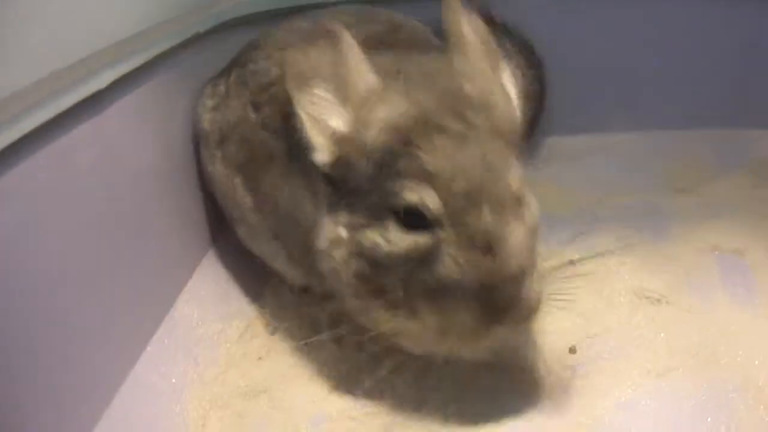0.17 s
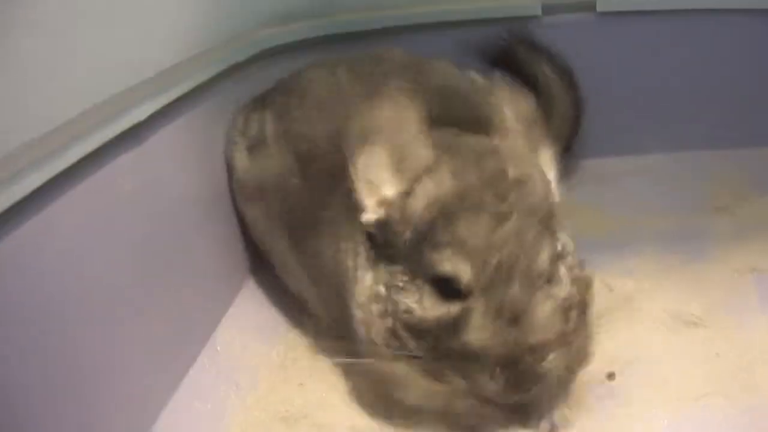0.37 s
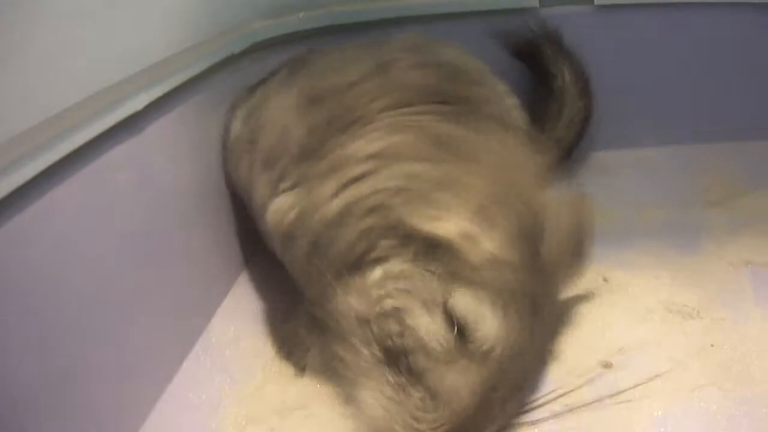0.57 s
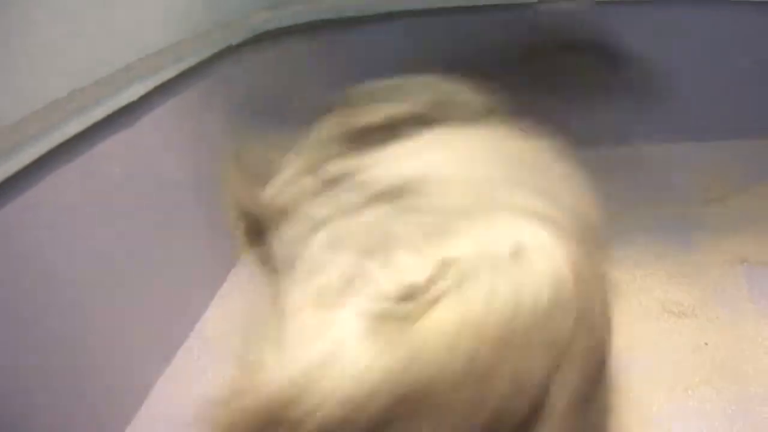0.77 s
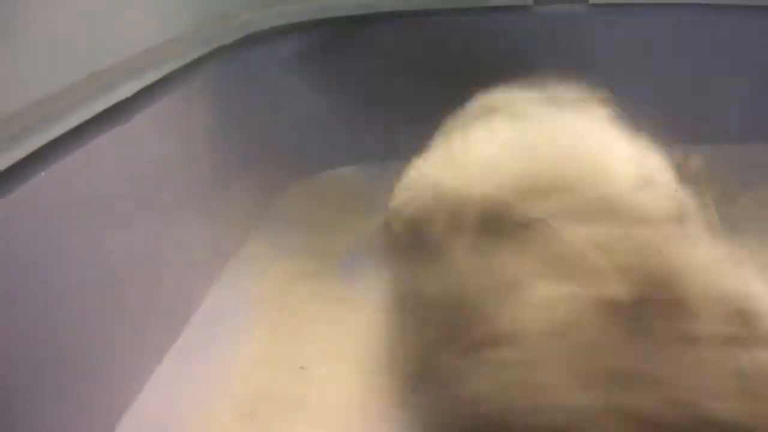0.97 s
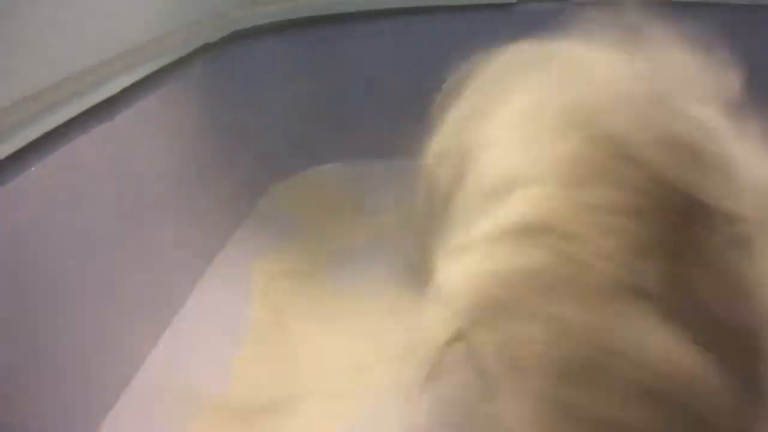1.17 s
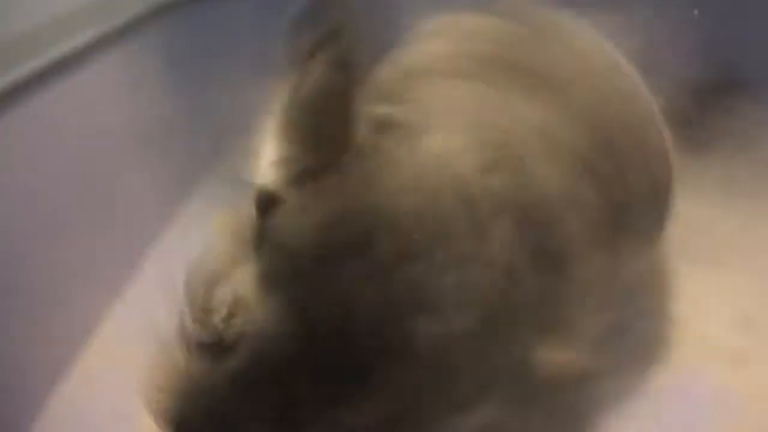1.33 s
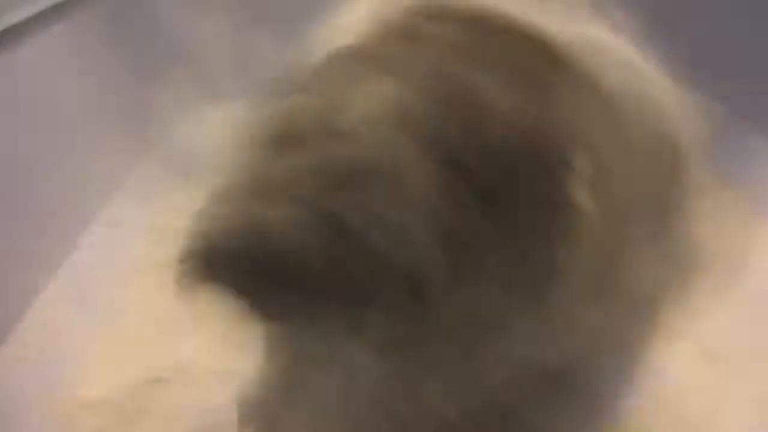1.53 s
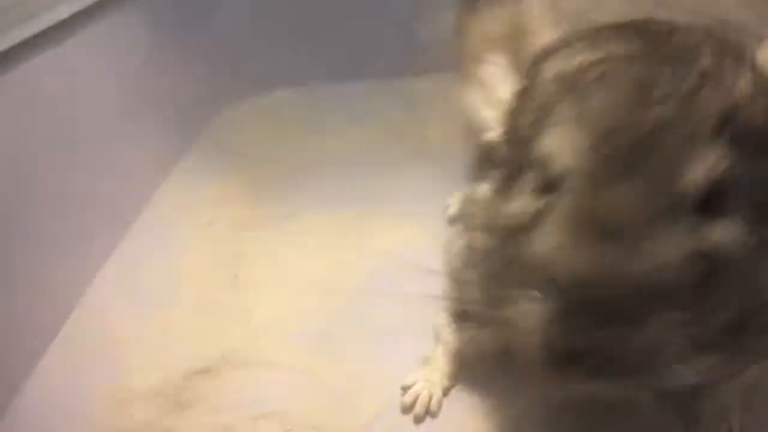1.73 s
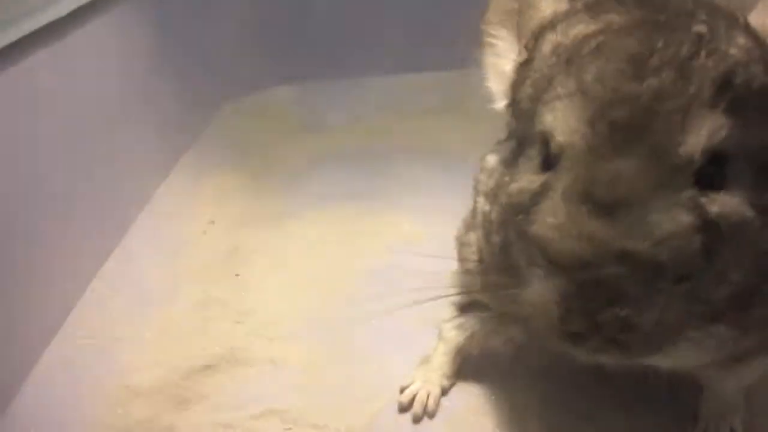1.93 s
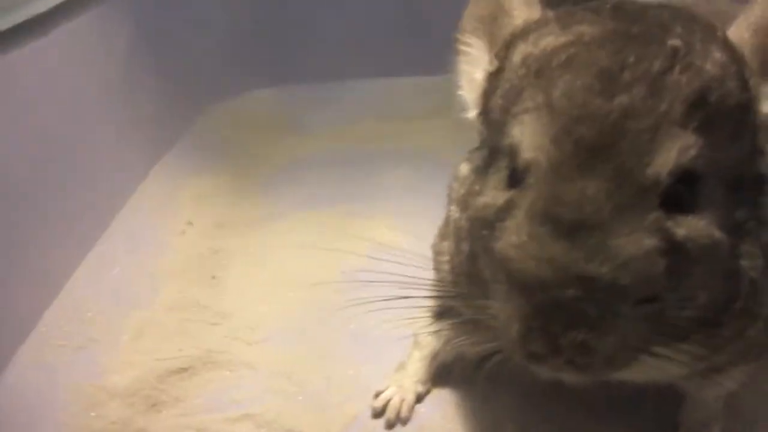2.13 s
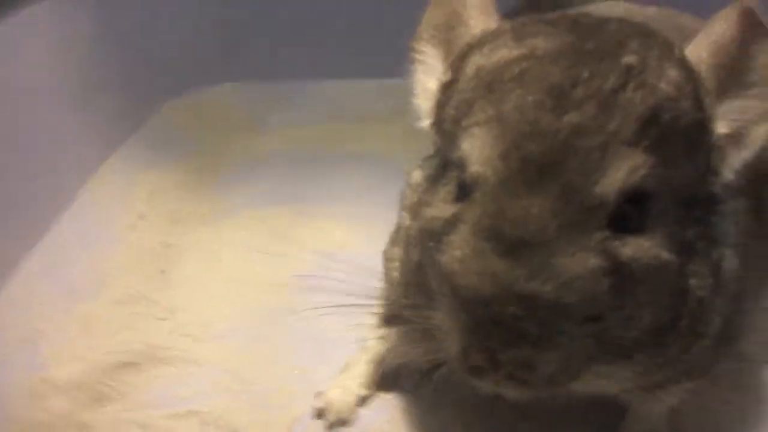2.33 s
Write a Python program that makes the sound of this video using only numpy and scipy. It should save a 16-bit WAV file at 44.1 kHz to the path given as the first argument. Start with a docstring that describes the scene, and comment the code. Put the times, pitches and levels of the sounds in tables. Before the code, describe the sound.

Dry, grainy fur-on-dust swishes in short bouts, with small feet knocking hollow plastic and the body thumping softly; heard very close in a quiet room, thinning to a few faint scrapes at the end.

```python
"""Chinchilla dust bath

A chinchilla rolls in dry bathing dust in a plastic tub, close to the microphone.
Rubbing is grainy noise in bouts; flicks are short noise sprays; knocks and thumps are damped modes.
Noise rumbles as weight shifts; quiet room noise and the room's faint hollow hum lie behind.
A limiter ducks the whole sound at its hardest peaks.
"""
import sys
import numpy as np
from scipy import signal
from scipy.fft import rfft, irfft, next_fast_len
from scipy.io import wavfile
from scipy.ndimage import uniform_filter1d, minimum_filter1d, map_coordinates

SR = 44100
rng = np.random.default_rng(int(sys.argv[2]) if len(sys.argv) > 2 else 0)


def unload_audio(sound):
    """Save the sound as a 16-bit wav file, at the path given as the first command line argument."""
    columns = np.transpose(np.atleast_2d(sound))
    # keep every value between -1 and 1, then stretch to whole-number steps
    steps = np.round(np.clip(columns, -1, 1) * 32767)
    wavfile.write(sys.argv[1], SR, steps.astype(np.int16))


N = 110250


def amp(db):
    """Decibels to gain."""
    return 10 ** (np.asarray(db) / 20)


def unit(x):
    """Scale to rms 1."""
    return x / np.sqrt(np.mean(x ** 2) + 1e-20)


def level(rows):
    """Gain per sample, linear in dB between (time [s], level [dB]) rows."""
    times_s, levels_db = np.transpose(rows)
    return amp(np.interp(np.arange(N) / SR, times_s, levels_db))


def wobble(knots_per_s):
    """Smooth random curve through normally distributed knots."""
    knots = rng.standard_normal(4096)
    return map_coordinates(knots, [np.arange(N) * knots_per_s / SR], mode="wrap")


def colour(x, spectrum, peaks=()):
    """Filter x by (frequency [Hz], gain [dB]) points and resonant peaks; rms 1."""
    m = next_fast_len(N + 8192)
    f = np.fft.rfftfreq(m, 1 / SR)
    hz, db = np.transpose(spectrum)
    gain_db = np.interp(np.log(f + 1), np.log(hz + 1), db)
    for centre_hz, width_hz, lift_db in peaks:
        gain_db = gain_db + lift_db / (1 + (2 * (f - centre_hz) / width_hz) ** 2)
    return unit(irfft(rfft(x, m) * amp(gain_db), m)[:N])


def noise(spectrum, peaks=()):
    """Coloured noise of rms 1."""
    return colour(rng.standard_normal(N), spectrum, peaks)


def decay(t, t60_s):
    """Gain that falls 60 dB in t60_s."""
    return np.exp(-np.log(1000) * t / t60_s)


def ring(t, hz, t60_s, attack_s):
    """One damped mode with an exponential onset."""
    return np.sin(2 * np.pi * hz * t) * decay(t, t60_s) * (1 - np.exp(-t / attack_s))


def add(out, start_s, x):
    """Mix x into out at start_s."""
    i = round(start_s * SR)
    out[i:i + len(x)] += x[:N - i]


GRAINS_PER_S, GRAIN_SHARE, GRAIN_SPREAD_DB = 6500, 0.28, 2.5  # share of power


def grains():
    """Sparse random slips of dust grains over a smooth swish of fur."""
    struck = rng.random(N) < GRAINS_PER_S / SR
    sizes = rng.standard_normal(N) * amp(GRAIN_SPREAD_DB * rng.standard_normal(N))
    swish = rng.standard_normal(N)
    return np.sqrt(GRAIN_SHARE) * unit(struck * sizes) + np.sqrt(1 - GRAIN_SHARE) * swish


PATCH_HZ, PATCH_S = 110, 0.035  # size of the resonant patches
STFT_SIZE, STFT_HOP = 1024, 512


def shifting(x, depth_db):
    """The body covers and frees parts of the tub, so narrow resonances come and go."""
    z = signal.stft(x, nperseg=STFT_SIZE)[2]
    bins = max(1, round(PATCH_HZ * STFT_SIZE / SR))
    frames = max(1, round(PATCH_S * SR / STFT_HOP))
    field = uniform_filter1d(rng.standard_normal(z.shape), bins, axis=0)
    field = uniform_filter1d(field, frames, axis=1)
    shifted = signal.istft(z * amp(depth_db * unit(field)), nperseg=STFT_SIZE)[1]
    return unit(shifted[:N])


# rubbing bouts, one list each: (time [s], hiss level before trim [dB], rasp level before trim [dB])
RUB_BOUTS = [
    [(0.0, -54, -77), (0.044, -80, -77), (0.062, -44.5, -60), (0.096, -71, -49.5), (0.118, -49, -46),
     (0.15, -84, -67), (0.188, -67, -55), (0.226, -46, -52), (0.235, -36, -35)],
    [(0.266, -52, -45), (0.272, -63, -71), (0.28, -41.5, -35), (0.304, -34, -36), (0.334, -36, -36.5),
     (0.344, -28, -38.5), (0.358, -28, -23), (0.376, -49.5, -44), (0.38, -44, -46)],
    [(0.38, -43, -51), (0.394, -28, -29), (0.434, -29, -35), (0.462, -26.5, -24), (0.472, -37, -31.5),
     (0.482, -31, -24.5), (0.502, -34, -38), (0.528, -28, -26.5), (0.57, -39.5, -40)],
    [(0.57, -40, -27), (0.594, -38, -34), (0.612, -28.5, -22), (0.672, -41, -41.5), (0.692, -40, -27.5),
     (0.73, -38.5, -39)],
    [(0.73, -33, -29.5), (0.744, -29.5, -26), (0.76, -34, -33), (0.796, -30, -24.5), (0.842, -30.5, -34),
     (0.854, -59, -48), (0.862, -39, -43), (0.872, -55, -41), (0.876, -30, -29)],
    [(0.9, -59, -58), (0.952, -48, -43.5), (0.99, -41.5, -46), (1.008, -58, -68), (1.036, -40.5, -52),
     (1.07, -29.5, -34.5), (1.08, -38, -28), (1.094, -45, -39.5), (1.117, -25, -34)],
    [(1.15, -56, -37), (1.156, -50, -51), (1.194, -39.5, -37.5), (1.23, -43, -44.5), (1.258, -30, -26),
     (1.288, -38, -38.5), (1.318, -37.5, -36), (1.336, -43.5, -41), (1.36, -40.5, -36.5)],
    [(1.36, -39, -35.5), (1.38, -31, -34), (1.388, -35, -35), (1.438, -25.5, -27.5), (1.46, -29, -32),
     (1.47, -38.5, -30.5), (1.49, -27.5, -37), (1.506, -45, -32.5), (1.52, -38, -44)],
    [(1.522, -44, -40), (1.528, -30, -27.5), (1.572, -24, -27), (1.584, -36, -28), (1.6, -30, -20.5),
     (1.614, -43, -37), (1.632, -50, -39)],
    [(1.67, -35, -59), (1.686, -47, -37.5), (1.698, -36.5, -27.5), (1.71, -40, -38), (1.728, -41, -33.5),
     (1.742, -43, -43), (1.762, -49.5, -46.5), (1.768, -51, -56), (1.8, -58, -51)],
    [(1.8, -60, -77), (1.812, -41.5, -31), (1.84, -37.5, -39), (1.854, -35.5, -35), (1.866, -39.5, -46),
     (1.902, -42, -34.5), (1.95, -54, -64), (1.954, -55, -53), (2.015, -63, -64)],
    [(2.05, -52, -52), (2.162, -57, -52.5), (2.174, -66, -63), (2.292, -68, -74), (2.306, -51, -48),
     (2.324, -55, -56), (2.352, -59, -55), (2.49, -37, -34), (2.5, -47, -42)],
]
# dust hiss spectrum: (frequency [Hz], density [dB per Hz])
HISS_SPECTRUM = [(300, -73), (1500, -1), (2600, -6), (3200, -2.5), (4200, 0), (6000, -3.5), (8000, -5),
                 (10800, -8)]
# faint wall resonances in the hiss: (centre [Hz], width [Hz], lift [dB])
HISS_RESONANCES = [(3080, 70, 3.5), (3240, 70, 4), (3552, 50, 3), (3940, 130, 3), (4398, 40, 3)]
# tub rasp spectrum: (frequency [Hz], density [dB per Hz])
RASP_SPECTRUM = [(60, -2), (150, -3), (250, -2), (350, -20), (470, 0.5), (800, -0.5), (1300, -0.5),
                 (2000, -11), (2800, -11.5), (6000, -27)]
# tub resonances excited by rubbing: (centre [Hz], width [Hz], lift [dB])
RASP_RESONANCES = [(461, 120, 5), (780, 330, 5.5), (995, 87, 5.5), (1260, 52, -0.5), (1681, 46, 8),
                   (1859, 29, 12.5), (2132, 420, 7), (2350, 9, -1.5)]
HISS_TRIM_DB, RASP_TRIM_DB, CONTACT_FADE_S = -0.5, 2, 0.027


def rubbing(flutter_db=1.23):
    """Dust hisses under the fur and rasps through the tub, catching and slipping."""
    t = np.arange(N) / SR
    rows = np.concatenate(RUB_BOUTS)
    rows = rows[np.argsort(rows[:, 0], kind="stable")]
    touching = np.any([(t >= bout[0][0]) & (t <= bout[-1][0]) for bout in RUB_BOUTS], axis=0)
    contact = uniform_filter1d(touching * 1.0, max(1, round(CONTACT_FADE_S * SR)))
    hiss = shifting(colour(grains(), HISS_SPECTRUM, HISS_RESONANCES), depth_db=1.7)
    rasp = shifting(colour(grains(), RASP_SPECTRUM, RASP_RESONANCES), depth_db=3.0)
    hiss = amp(HISS_TRIM_DB) * level(rows[:, [0, 1]]) * hiss
    rasp = amp(RASP_TRIM_DB) * level(rows[:, [0, 2]]) * rasp
    return contact * amp(flutter_db * wobble(120)) * (hiss + rasp)


# flung pinches of dust: (time [s], level [dB], length [s], resonance centre [Hz])
DUST_FLICKS = [(0.094, -53, .006, 2000), (0.511, -34, 0.0076, 4080), (0.86, -42, 0.02, 5800),
               (1.061, -27.5, 0.021, 6070), (1.527, -45, 0.01, 4470), (1.634, -34.5, 0.0071, 7100),
               (2.021, -38, 0.028, 6200), (2.365, -42.5, 0.0048, 4900)]
FLICK_RISE_S, FLICK_WIDTH_HZ, FLICK_LIFT_DB = 0.00094, 1000, 12.5


def flicks():
    """A paw flings a pinch of dust against the plastic: a short resonant spray of grains."""
    out, t = np.zeros(N), np.arange(SR // 8) / SR
    for start_s, db, length_s, hz in DUST_FLICKS:
        peak = (hz, FLICK_WIDTH_HZ, FLICK_LIFT_DB)
        spray = colour(grains(), HISS_SPECTRUM, [peak])[:len(t)]
        envelope = (1 - np.exp(-t / FLICK_RISE_S)) * np.exp(-(t / length_s) ** 2)
        add(out, start_s, amp(db) * spray * envelope)
    return out


KNOCK_ATTACK_S, GRIT_T60_S = 0.00055, 0.036
SHUDDER_DB, SHUDDER_T60_S = -22.5, 0.13  # level against the knock


def modes(t, table, scatter_db):
    """Sum of damped modes with randomly scattered levels."""
    return sum(amp(db + scatter_db * rng.standard_normal()) * ring(t, hz, t60_s, KNOCK_ATTACK_S)
               for hz, db, t60_s in table)


def excerpt(x, length):
    """Excerpt of x from a random point, wrapping round."""
    return np.roll(x, rng.integers(N))[:length]


# feet on the tub:
# (time [s], level [dB], spot pitch [Hz], spot t60 [s], tub ring level [dB], grit level [dB])
FOOT_KNOCKS = [ (0.077, -31, 507, 0.027, -57, -57), (0.1145, -27.5, 532, 0.043, -41.5, -54),
               (0.2422, -8.5, 770, 0.033, -36, -15), (0.2467, -8, 517, 0.034, -48, -60),
               (0.3909, -16.5, 614, 0.056, -38, -33), (0.4113, -17, 610, 0.024, -22.5, -21),
               (0.4795, -16.5, 632, 0.069, -22, -25), (0.5065, -6, 340, 0.0095, -25, -20.5),
               (0.6845, -24, 793, 0.079, -42, -43), (0.8450, -9.5, 390, 0.01, -33, -28.5),
               (0.8813, 2.5, 880, 0.0085, -24, -19), (0.8858, 0, 730, 0.016, -24, -40),
               (0.8938, -8.5, 620, 0.031, -42, -45), (0.9669, -6.5, 770, 0.011, -50, -35),
               (0.9867, 1, 400, 0.0088, -20, -43), (0.9965, -13, 643, 0.073, -32, -50),
               (1.0780, -5.5, 560, 0.023, -28, -42), (1.1186, 1.5, 446, 0.022, -15.5, -20),
               (1.2515, -15, 694, 0.024, -42, -35), (1.271, -14, 600, 0.012, -56, -26),
               (1.378, -9, 503, 0.023, -21.5, -37), (1.3813, -13.5, 475, 0.015, -31, -42),
               (1.5981, -18, 975, 0.05, -30, -39), (1.6449, 2.5, 477, 0.027, -15.5, -14),
               (1.8085, -21, 825, 0.0052, -29, -49), (1.8154, -13.5, 494, 0.056, -29, -51),
               (1.848, -22.5, 671, 0.084, -55, -28.5), (2.037, -24, 490, 0.061, -45, -43)]
# tub modes: (frequency [Hz], level against the tub ring [dB], t60 [s])
TUB_MODES = [(258, -1, 0.034), (355, -12, 0.092), (505, 0, 0.11), (573, -8.5, 0.078), (717, 8, 0.037),
             (833, 1.5, 0.06), (925, -10, 0.14), (1178, -0.5, 0.036), (1364, -2, 0.045),
             (1690, -18.5, 0.022)]
# bent spot's snap on contact: (frequency [Hz], level against the knock [dB], t60 [s])
SNAP_MODES = [(1524, -14, 0.0087), (1885, -23.5, 0.015), (3730, -19.5, 0.0038)]
# crushed grit spectrum: (frequency [Hz], density [dB per Hz])
GRIT_SPECTRUM = [(200, 14.5), (900, -6), (2000, 3.5), (3500, -2.5), (6000, -12.5), (10800, -17)]
# tub's diffuse shudder spectrum: (frequency [Hz], density [dB per Hz])
SHUDDER_SPECTRUM = [(50, -28), (130, -3), (300, -3), (600, -1.5), (900, -17), (1600, -14.5), (2500, -35),
                    (10000, -40.5)]


def knocks(scatter_db=0.5):
    """Each foot bends a spot of plastic, rings the whole tub and crushes some grit."""
    out, t = np.zeros(N), np.arange(SR // 4) / SR
    grit, diffuse = noise(GRIT_SPECTRUM), noise(SHUDDER_SPECTRUM)
    for start_s, db, hz, t60_s, ring_db, grit_db in FOOT_KNOCKS:
        spot = ring(t, hz, t60_s, KNOCK_ATTACK_S)
        tub = modes(t, TUB_MODES, scatter_db)
        crunch = excerpt(grit, len(t)) * decay(t, GRIT_T60_S)
        shudder = amp(SHUDDER_DB) * excerpt(diffuse, len(t)) * decay(t, SHUDDER_T60_S)
        snap = modes(t, SNAP_MODES, scatter_db)
        knock = amp(db) * (spot + snap + shudder)
        add(out, start_s, knock + amp(ring_db) * tub + amp(grit_db) * crunch)
    return out


# body against the floor: (time [s], level [dB], pitch [Hz], t60 [s])
BODY_THUMPS = [ (0.246, -21.5, 130, 0.039), (0.394, -27, 172, .08), (0.48, -21, 145, 0.12),
               (0.807, -13.5, 132, 0.031), (0.645, -24, 102, 0.029), (0.841, -3.5, 136, 0.044),
               (0.861, -16, 290, 0.022), (0.8677, -10.5, 194, 0.029), (0.912, -22, 178, 0.084),
               (0.929, -24, 112, 0.081), (0.988, -9.5, 279, 0.081), (1.009, -18.5, 162, 0.2),
               (1.081, -16, 166, .06), (1.118, -23, 182, 0.11), (1.195, -15.5, 143, 0.033),
               (1.379, -27, 148, 0.044), (1.547, -27, 79, 0.15), (1.724, -22, 333, 0.043),
               (1.733, -15.5, 245, 0.028), (1.7477, -17.5, 164, 0.076), (2.213, -37.5, 210, 0.16)]
# weight shifting on the floor: (time [s], rumble level before trim [dB])
WEIGHT_SHIFTS = [(0.0, -61), (0.12, -41.5), (0.2, -53), (0.4, -32.5), (0.47, -33), (0.86, -42), (1.0, -40),
                 (1.04, -26.5), (1.18, -33.5), (1.33, -42), (1.68, -37), (1.82, -48), (2.15, -53.5),
                 (2.5, -45)]
# rumble spectrum: (frequency [Hz], density [dB per Hz])
RUMBLE_SPECTRUM = [(25, 1.5), (50, 3), (75, -10), (130, -7.5), (200, -10), (320, -9.5), (600, -15),
                   (2000, -52)]
RUMBLE_TRIM_DB, THUMP_ATTACK_S = 0.5, 0.0019


def body():
    """Soft thumps as single damped modes, over the noise rumble of shifting weight."""
    out = amp(RUMBLE_TRIM_DB) * level(WEIGHT_SHIFTS) * noise(RUMBLE_SPECTRUM)
    t = np.arange(SR // 4) / SR
    for start_s, db, hz, t60_s in BODY_THUMPS:
        add(out, start_s, amp(db) * ring(t, hz, t60_s, THUMP_ATTACK_S))
    return out


# room's faint hollow hum: (time [s], level [dB])
ROOM_HUM_LEVEL = [(0, -73), (1.2, -55), (1.37, -37), (1.5, -39.5), (1.62, -33.5), (1.78, -45), (1.85, -43),
                  (1.94, -49.5), (2.015, -44.5), (2.06, -38.5), (2.12, -42.5), (2.16, -40), (2.27, -46),
                  (2.37, -45), (2.43, -37.5), (2.5, -57)]
# band noise in the hum: (frequency [Hz], density [dB per Hz])
ROOM_HUM_SPECTRUM = [(100, -17), (160, -10), (250, -9.5), (340, -16.5), (430, -5.5), (490, 1.5), (530, -9),
                     (600, -23), (1300, -21.5), (3000, -74)]
# wavering tones in the hum: (frequency [Hz], rms level against the band noise [dB])
ROOM_HUM_TONES = [(503, -2.5), (561, -9)]


def room_hum(drift_rad=0.83):
    """The room's faint hollow hum: band noise and tones whose phase drifts."""
    t = np.arange(N) / SR
    tones = sum(np.sqrt(2) * amp(db) * np.sin(2 * np.pi * hz * t + drift_rad * wobble(12))
                for hz, db in ROOM_HUM_TONES)
    return level(ROOM_HUM_LEVEL) * (noise(ROOM_HUM_SPECTRUM) + tones)


# room noise spectrum: (frequency [Hz], density [dB per Hz])
ROOM_SPECTRUM = [(18, -61), (30, -63), (144, -11), (293, -22.5), (515, -15.5), (1020, -20.5), (1940, -25.5),
                 (2470, -30.5), (2790, -27.5), (10500, -39.5), (13600, -83), (22000, -120)]
ROOM_DB = -49  # rms before the bass cut


def room_noise():
    """Quiet, steady coloured noise."""
    return amp(ROOM_DB) * noise(ROOM_SPECTRUM)


def scene():
    """All sources at one microphone."""
    return (rubbing() + flicks() + knocks() + body() + room_hum() + room_noise())[None]


LOW_CUT_HZ, TOP_HZ = 88, 11100
LIMIT_DB, HOLD_S, SMOOTH_SAMPLES = -5, 0.0257, 64


def record(dry):
    """Bass cut, peak limiter with hold, then a steep top cut."""
    bass_cut = signal.butter(4, LOW_CUT_HZ, "highpass", fs=SR, output="sos")
    dry = signal.sosfilt(bass_cut, dry)
    needed = np.minimum(1, amp(LIMIT_DB) / (np.abs(dry) + 1e-9))
    hold = max(3, round(HOLD_S * SR))
    held = minimum_filter1d(needed, hold, origin=(hold - 1) // 2)  # looks back only
    gain = uniform_filter1d(held, size=SMOOTH_SAMPLES)
    m = next_fast_len(N + 8192)
    passband = np.fft.rfftfreq(m, 1 / SR) < TOP_HZ
    return irfft(rfft(dry * gain, m) * passband, m)[:, :N]


dry = scene()
out = record(dry)
unload_audio(out)
```